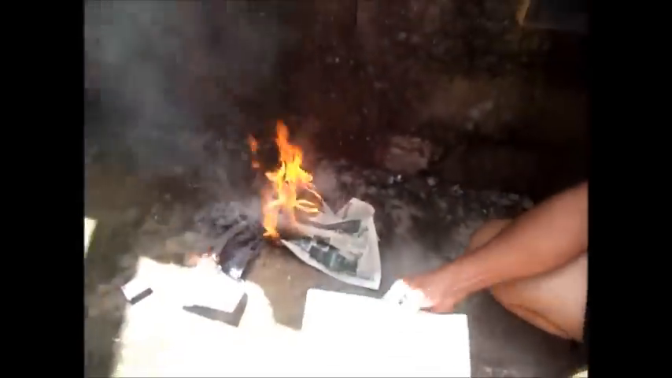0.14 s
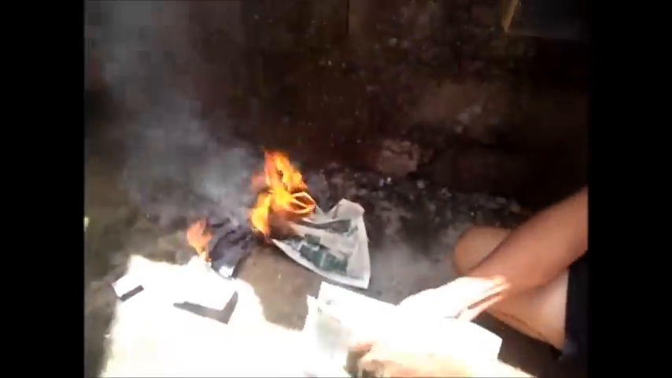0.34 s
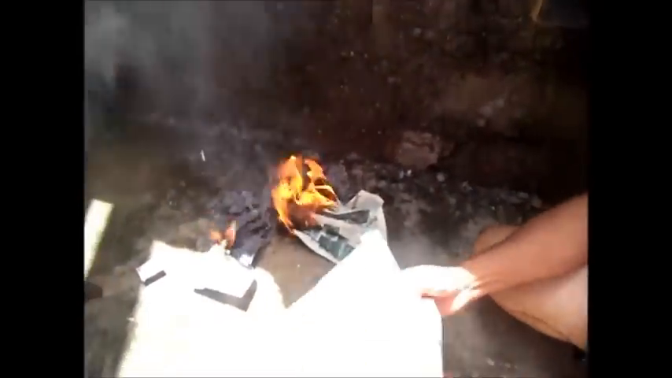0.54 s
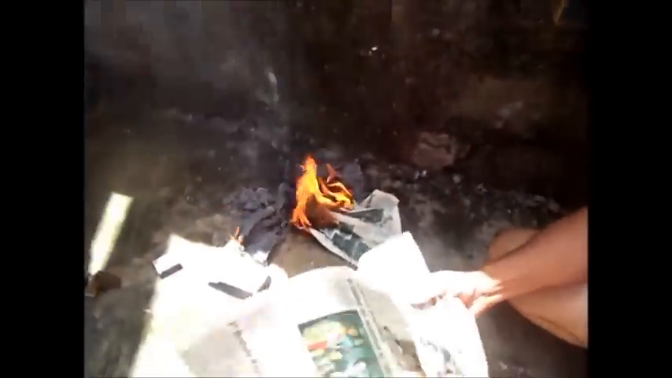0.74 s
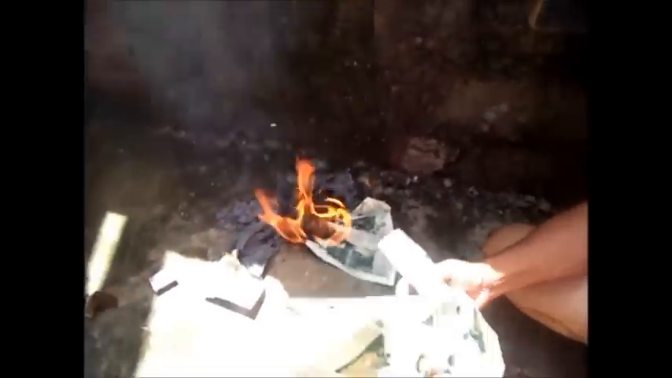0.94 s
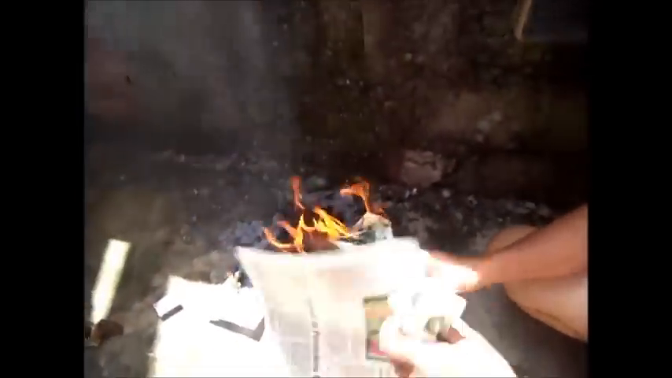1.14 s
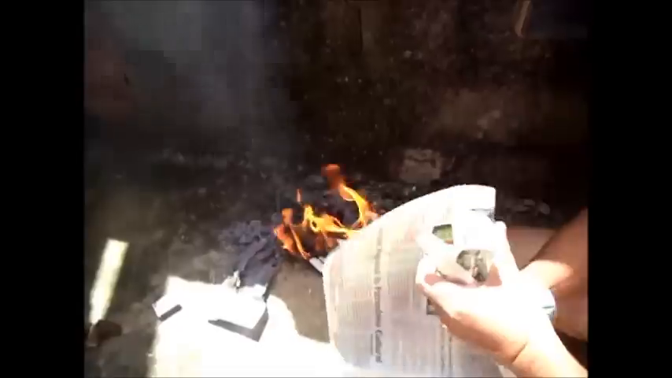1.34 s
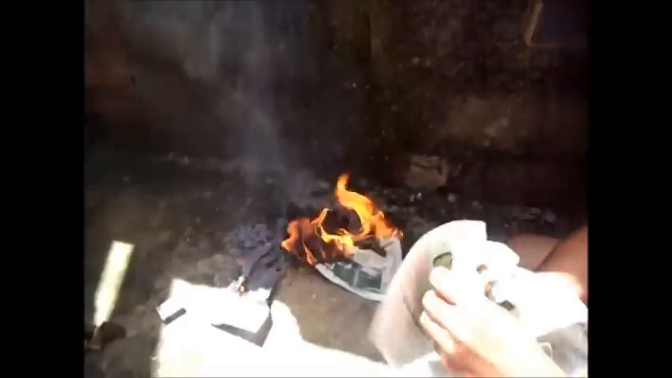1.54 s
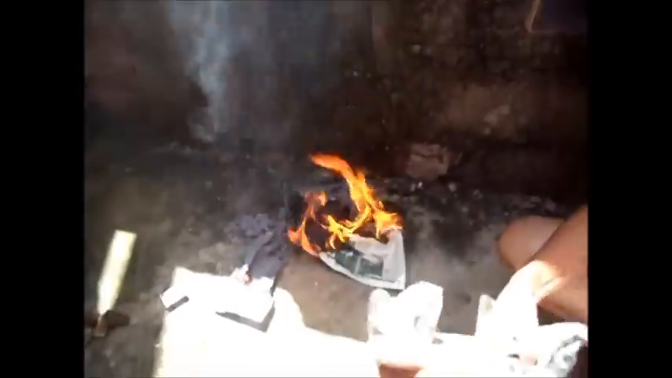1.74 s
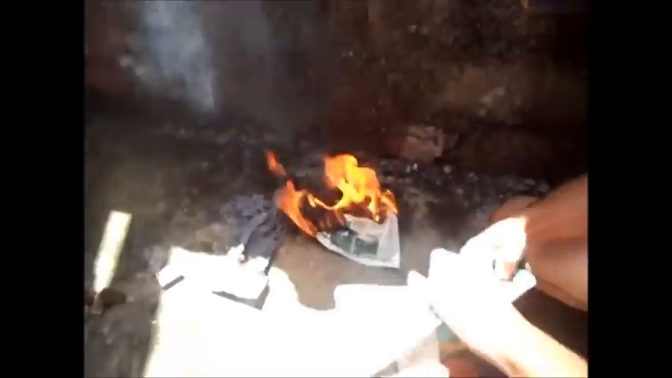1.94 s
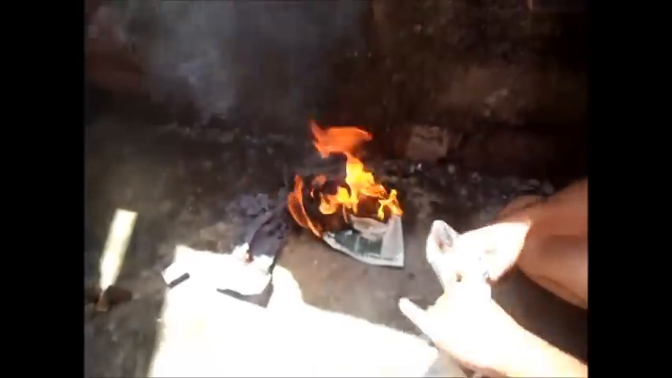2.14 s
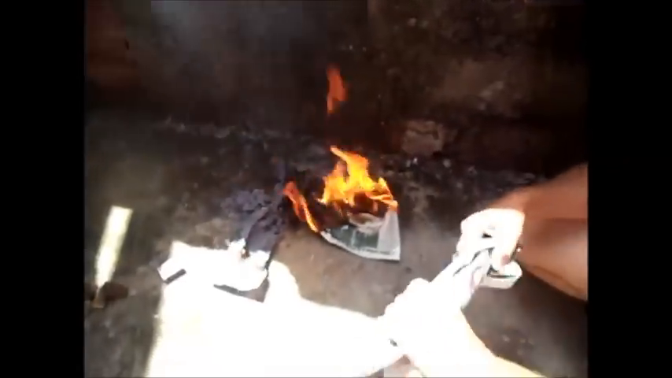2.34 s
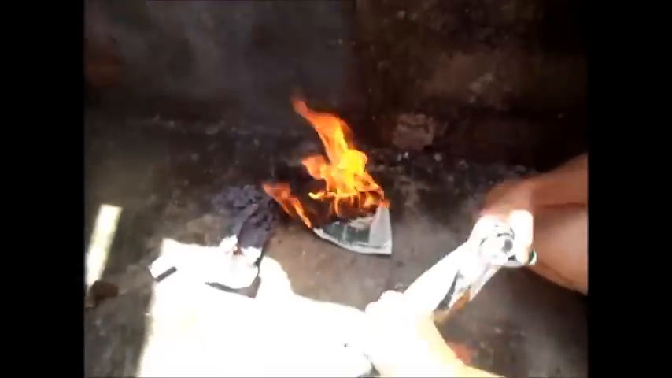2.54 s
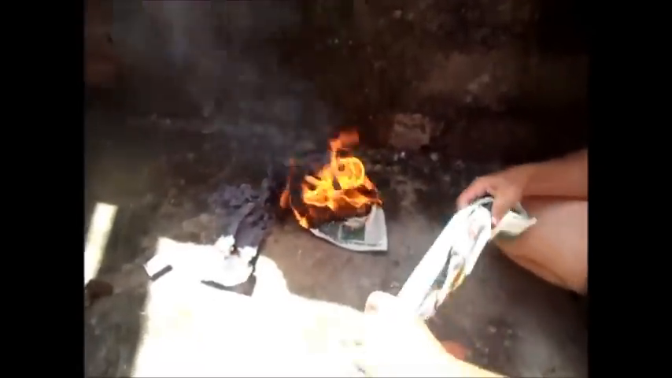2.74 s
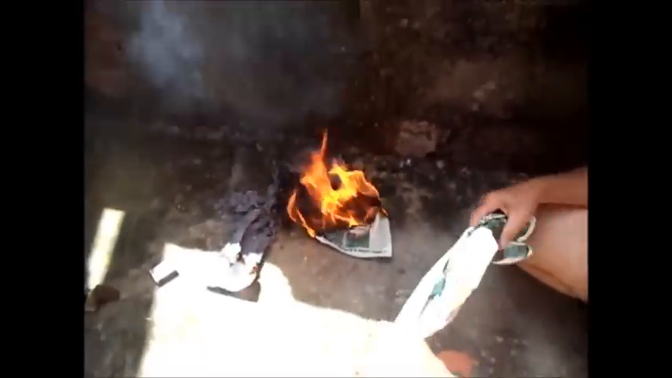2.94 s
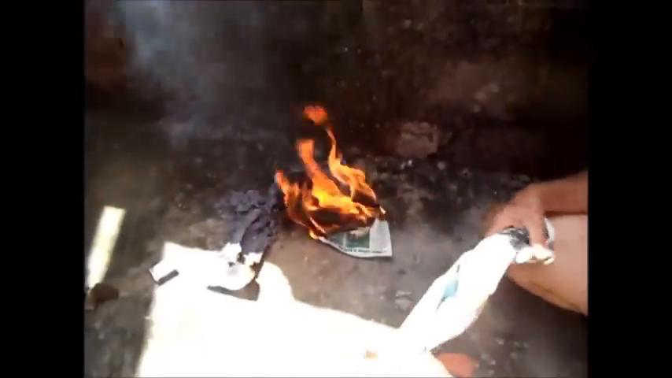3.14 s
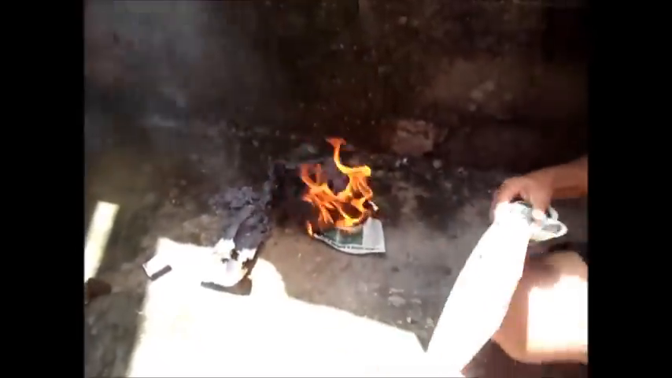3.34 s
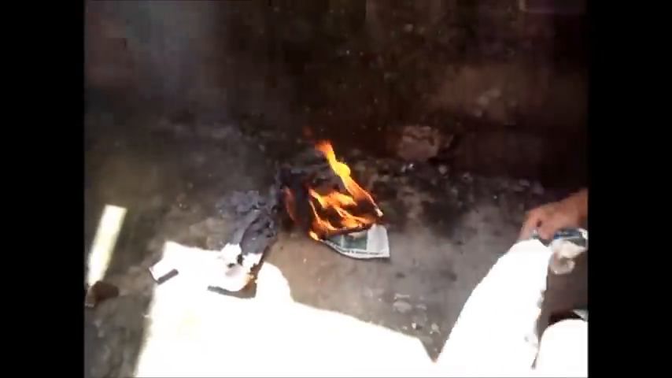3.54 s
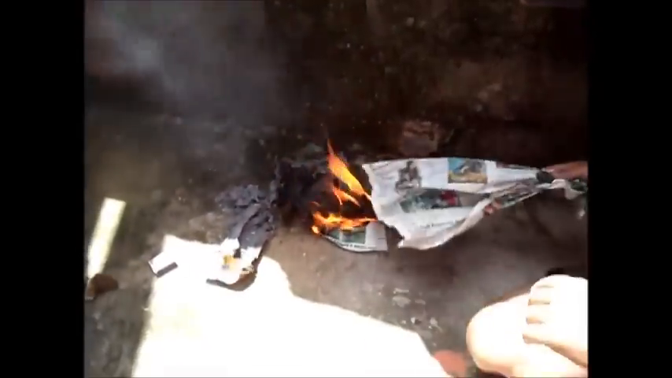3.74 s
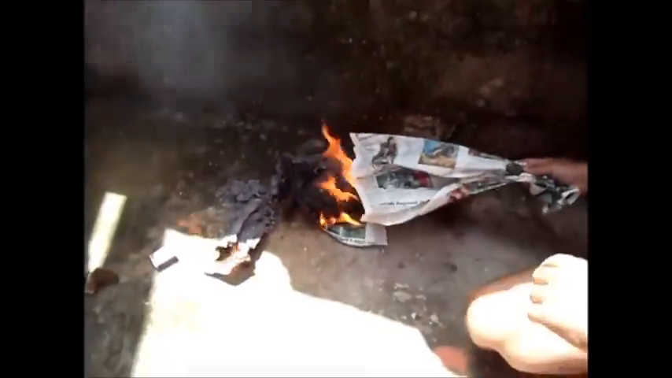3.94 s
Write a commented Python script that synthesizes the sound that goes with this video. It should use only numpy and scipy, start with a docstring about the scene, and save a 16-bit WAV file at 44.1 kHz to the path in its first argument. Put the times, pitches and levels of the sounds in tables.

```python
"""A dull tap and faint rustling open the scene: hands lift a sheet of newspaper, crush it and twist it into a spill.
Countless tiny ringing buckles and sliding noise make the rustle; filtered noise bursts make the
dull taps of the sheet popping through, the sharp snaps of creases and the bumps on the wad.
Underneath, a small paper fire flutters as low noise, with a faint mains hum of summed harmonics and soft air.
A close yard wall and the ground answer the paper briefly."""
import sys
import numpy as np
from scipy import signal
from scipy.fft import rfft, irfft, next_fast_len
from scipy.io import wavfile
from scipy.ndimage import uniform_filter1d, map_coordinates

SR = 44100
rng = np.random.default_rng(int(sys.argv[2]) if len(sys.argv) > 2 else 0)


def master_out(mix):
    """Clip the mix to full scale and print it as 16-bit PCM to the path in sys.argv[1]."""
    frames = np.transpose(np.atleast_2d(mix))
    ceiling = np.clip(frames, -1, 1)
    pcm = np.round(ceiling * 32767).astype(np.int16)
    wavfile.write(sys.argv[1], SR, pcm)


N = 176400

# how hard the hands keep working the sheet: time_s, crisp_level_db, hollow_flex_re_crisp_db (before FLEX_DB)
HANDLING = [(0, -52, 2), (.11, -53.5, 5), (.17, -44.5, -5.5), (.43, -50, 2), (.49, -36.5, -2),
            (.68, -39, 6.5), (.73, -46.5, 3.5), (.99, -43, -2), (1.1, -36.5, 0.5), (1.5, -47, 4.5),
            (1.555, -52, 3), (1.65, -32, 4), (2.0, -36, -1), (2.21, -38.5, -9.5), (2.33, -37, -2.5),
            (3.05, -34, -5.5), (3.29, -40.5, -3), (3.6, -42, -2), (3.71, -45.5, -4), (3.78, -54, 4),
            (4, -57.5, 4)]
# pushes and slides of the paper: middle_s, length_s, crisp_level_db, hollow_flex_re_crisp_db (before FLEX_DB)
PUSHES = [(0.041, 0.027, -49, 8), (0.208, 0.024, -40, -2), (0.26, 0.021, -36, -13), (0.344, .04, -38, 3),
          (0.473, 0.019, -35, 3), (0.628, 0.045, -34, -0.5), (.68, 0.032, -33, 5),
          (0.782, 0.065, -37.5, -7), (0.915, 0.046, -35, 4), (1.192, 0.037, -28, -6),
          (1.454, 0.015, -29.5, -25), (1.591, 0.016, -25, -8), (1.651, 0.071, -29.5, -3),
          (1.733, .016, -30.5, -6), (1.808, .083, -30, -1.5), (2.093, 0.051, -35, -2),
          (2.321, 0.043, -30.5, -6.5), (2.39, 0.094, -34, -4), (2.488, 0.053, -29.5, -11),
          (2.582, 0.057, -27, -8), (2.738, 0.014, -28, -4.5), (2.785, 0.014, -32, -1),
          (2.834, 0.03, -28, -18), (2.927, 0.019, -30, -13), (3.234, 0.039, -29.5, -7.5),
          (3.654, 0.035, -25, -10), (3.684, 0.046, -38, 1)]
# slack sheet flipping over: start_s, level_over_1ms_db
TAPS = [(.0148, -27), (.0617, -34), (.139, -40.5), (1.7045, -25.5), (2.503, -30)]
# creases giving way: start_s, level_over_1ms_db (before SNAP_DB), brightness_db_per_octave
SNAPS = [(.1512, -41, 0), (0.3279, -17, -2), (0.354, -29, 0), (0.387, -24.5, -5.5), (0.3958, -26.5, -2),
         (0.407, -32, 1), (.444, -29, -2.5), (.48, -22, 1.5), (0.52, -18.5, 0.5), (.5532, -29, -8.5),
         (0.571, -27.5, -5), (0.612, -20, 3), (0.613, -21.5, -4), (0.6337, -15, 7.5), (0.682, -19, 1),
         (0.701, -26, 0), (0.7373, -29.5, -6.5), (.7533, -26, 5), (0.782, -25, 7), (.8005, -22, -3.5),
         (0.8778, -24.5, 0), (0.899, -18.5, -0.5), (.9105, -25.5, 3), (0.9155, -19.5, 2), (0.9276, -12, 2),
         (0.9299, -18.5, -2.5), (0.941, -18, 9), (.9462, -25, -4.5), (.956, -33, 0), (.9692, -27, -6),
         (1.045, -24.5, -3), (1.056, -28, 4), (1.0719, -24, -4.5), (1.0845, -19.5, 5), (1.125, -26, -1),
         (1.175, -21.5, 7), (1.178, -27, -5.5), (1.1953, -16.5, 3), (1.285, -24, -0.5),
         (1.291, -18.5, -4.5), (1.3062, -23, -3), (1.3178, -19, 4), (1.346, -24.5, -1), (1.448, -24, -5.5),
         (1.4873, -29.5, -7), (1.5829, -24, -4), (1.59, -15.5, 0), (1.6216, -17, -0.5), (1.658, -24, -11),
         (1.672, -23, 0), (1.688, -22.5, -5), (1.74, -10, 11), (1.751, -20, 4), (1.7634, -16, 0),
         (1.782, -18.5, 6), (1.795, -23, -1), (1.8158, -20, -1), (1.827, -17.5, 3), (1.836, -23, 1),
         (1.8522, -23, 0), (1.8615, -17, 3), (1.8752, -26, 2), (1.9022, -20, -4), (1.927, -20.5, 0),
         (2.0164, -21.5, -4), (2.0414, -15, -3), (2.0488, -29, 0), (2.157, -24.5, -3), (2.236, -18, 6.5),
         (2.286, -24, -4), (2.3528, -13.5, 7), (2.3937, -22, -1), (2.404, -21, 2), (2.4666, -21.5, -2),
         (2.4886, -24, 5), (2.5173, -18.5, -3), (2.5307, -17.5, -3.5), (2.5602, -17, 4), (2.584, -20, -3),
         (2.614, -25, 0), (2.678, -27.5, 3), (2.7245, -20, 3), (2.7674, -17.5, -4), (2.8087, -24, -1),
         (2.8248, -17.5, 9), (2.872, -20, -2), (2.91, -20.5, 7), (2.991, -26, -1.5), (3.016, -21, 5),
         (3.066, -23, 3), (3.0938, -25, -3.5), (3.14, -19.5, 0), (3.155, -22, 2), (3.163, -19.5, 1),
         (3.23, -31, 5), (3.2534, -21, -3), (3.318, -26.5, -5), (3.364, -22.5, 4), (3.42, -25.5, -7),
         (3.4286, -21, 0), (3.5475, -20.5, -3), (3.567, -27, 4), (3.592, -21.5, -1.5), (3.634, -25, -4),
         (3.7107, -31.5, -1), (3.754, -29, 5.5), (3.805, -30, -5), (3.977, -33, 0)]
# hands bumping the wad: start_s, level_over_10ms_db
BUMPS = [(1.645, -52), (1.729, -43), (2.039, -39)]
# low flutter of the fire: time_s, level_db (before its random wobble)
FIRE_LEVEL = [(0, -52.5), (.08, -56), (.29, -53.5), (.38, -67), (.49, -53), (.74, -58.5), (.85, -51.5),
              (.98, -77), (1.42, -69), (1.56, -56), (2.17, -72), (2.44, -59), (2.6, -68), (2.78, -57),
              (3.05, -73), (3.32, -57.5), (3.5, -66)]
# mains harmonics from the first up: level_db (before HUM_SWELL)
HUM_HARMONICS = [-68.5, -66, -73.5, -67.5, -74, -69.5, -74, -72.5]
# swell of the whole hum: time_s, gain_db
HUM_SWELL = [(0, -2.5), (1.2, -5), (2.1, -7), (2.7, 0.5), (4, -0.5)]

# relative spectrum of the small folds: frequency_hz, gain_db
CRISP_SPECTRUM = [(100, -70), (600, -24.5), (1300, -20), (2600, -5.5), (3600, -4), (5200, -1), (6800, -1),
                  (8500, -1), (10200, -1.5), (12000, -7.5)]
# relative spectrum of the flexing open sheet: frequency_hz, gain_db
FLEX_SPECTRUM = [(50, -33), (150, -3.5), (350, -5.5), (600, 1), (1100, -1.5), (1900, 4.5), (3000, 0.5),
                 (5000, -15), (10000, -30)]
# relative spectrum of a tap: frequency_hz, gain_db
TAP_SPECTRUM = [(200, -23), (900, -10), (1700, 1), (2800, 1), (4500, -14), (9000, -21)]
# relative spectrum of a snap, before facet colour and tilt: frequency_hz, gain_db
SNAP_SPECTRUM = [(60, -19), (300, -27.5), (900, -16), (1500, -13), (2700, -2.5), (4000, -2), (5800, 4),
                 (8000, 2), (10200, 2.5), (12000, -6.5)]
# relative spectrum of a bump: frequency_hz, gain_db
BUMP_SPECTRUM = [(30, -33), (110, 0), (200, 4.5), (360, 0.5), (520, -10), (750, -3), (1500, -15),
                 (6000, -29)]
# relative spectrum of the flames: frequency_hz, gain_db
FLAME_SPECTRUM = [(20, 2.5), (45, -15), (90, 3.5), (108, -4), (127, 11), (155, -3), (220, -2), (500, -11.5),
                  (3000, -53)]
# relative spectrum of the still air: frequency_hz, gain_db
AIR_SPECTRUM = [(20, -23), (60, 11), (200, -5.5), (550, 5.5), (1000, 4.5), (2000, -13.5), (4000, -6),
                (5600, -10), (7000, -18), (11000, -9.5)]

BUCKLES_PER_S, BUCKLE_SPREAD_DB, BUCKLE_MAX_DB = 800, 1.5, 7
CROWDING = .4  # buckle rate grows as this power of the rustle's strength
CRISP_FADE_S, FLEX_FADE_S = 0.00085, 0.00096
RISE_SHARE = 0.62  # rise time over fade time of a buckle
PITCH_SPREAD = .28  # natural-log spread of a buckle's modes
CRISP_SLIDE_DB, FLEX_SLIDE_DB, FLEX_DB = -1, 2, -8
SLIPS_PER_S, SLIP_FADE_S, SLIP_SPREAD_DB, STEADY_SHARE = 170, .003, 3, .62
TAP_FADE_S = 0.0021
SNAP_DB, SNAP_FADE_S, SNAP_RISE_SHARE = 0.5, .0012, .4
CRACK_DB, CRACK_FADE_S, CRACK_GAP_S, CRACK_LOSS_DB = -5, 0.00027, .0012, 5.5
FACET_DB, FACET_OCTAVES = 5, .45
PIVOT_HZ = 6000  # brightness tilts about this frequency
BUMP_RUB_DB, BUMP_FADE_S = -5, 0.0029
MAINS_HZ, AIR_DB = 60, -57
LOW_CUT_HZ = 147  # low cut on the paper sounds, as of a small microphone, keeps deep bass out
WALL_DB, WALL_DELAY_S, WALL_T60_S = -14, .003, .08
TOP_HZ, EDGE_DB_PER_HZ = 10500, .037


def amp(db):
    """Amplitude ratio of a level in dB."""
    return 10 ** (np.asarray(db) / 20)


def unit(x):
    """x scaled to an RMS of 1."""
    return x / np.sqrt(np.mean(x ** 2) + 1e-20)


def curves(rows):
    """One value per sample for each column after the time."""
    time_s, *columns = np.transpose(rows)
    return [np.interp(np.arange(N) / SR, time_s, column) for column in columns]


def wobble(knots_per_s):
    """A smooth random curve."""
    return map_coordinates(rng.standard_normal(2000), [np.arange(N) * knots_per_s / SR], mode="wrap")


def coloured(x, spectrum, tilt_db=0):
    """x through a causal minimum-phase filter with the given spectrum, tilted in dB per octave above 500 Hz."""
    m = 2 * next_fast_len(len(x))
    hz = np.fft.rfftfreq(m, 1 / SR) + 1
    knot_hz, knot_db = np.transpose(spectrum)
    gain_db = np.interp(np.log(hz), np.log(knot_hz), knot_db)
    gain_db += tilt_db * np.log2(np.maximum(hz, 500) / PIVOT_HZ)
    # folding the cepstrum to one side makes the filter causal
    cepstrum = irfft(np.log(amp(gain_db)))
    cepstrum[1:m // 2] *= 2
    cepstrum[m // 2 + 1:] = 0
    response = np.exp(rfft(cepstrum))
    return irfft(rfft(x, m) * response)[:len(x)]


def add(track, start_s, sound):
    """Mix a sound into the track."""
    part = track[max(0, round(start_s * SR)):][:len(sound)]
    part += sound[:len(part)]


def burst(fade_s, rise_share=0, size=1024):
    """A noise burst of unit energy that builds up and dies away."""
    fades = np.arange(1, size + 1) / SR / max(fade_s, 1 / SR)
    rise = 1 - np.exp(-fades / (rise_share + 1e-6))
    noise = rng.standard_normal(size) * np.exp(-fades) * rise
    return noise / np.linalg.norm(noise)


def buckles(strength, low_hz, high_hz, fade_s, modes=7, size=256):
    """Tiny unequal buckles crowd in as the push grows; each rings a few brief modes; local level is evened."""
    rate_per_s = BUCKLES_PER_S * (strength / strength.mean()) ** CROWDING
    start = np.flatnonzero(rng.random(N) < rate_per_s / SR)
    normal = rng.standard_normal((len(start), modes + 1))
    even = rng.random((len(start), modes + 1))
    gain = amp(np.minimum(BUCKLE_SPREAD_DB * normal[:, :1], BUCKLE_MAX_DB))
    centre_hz = low_hz + (high_hz - low_hz) * even[:, :1]
    mode_hz = centre_hz * np.exp(PITCH_SPREAD * normal[:, 1:])
    t = np.arange(size) / SR
    cycles = mode_hz[..., None] * t + even[:, 1:, None]
    ring = np.sin(2 * np.pi * cycles).sum(1)
    envelope = np.exp(-t / fade_s) * (1 - np.exp(-t / (RISE_SHARE * fade_s)))
    grains = gain * ring * envelope
    places = start[:, None] + np.arange(size)
    x = np.bincount(places.ravel(), grains.ravel(), N + size)[:N]
    local_power = np.abs(uniform_filter1d(x ** 2, size=1100))
    return x / np.sqrt(local_power + 0.0016)


def slips():
    """Stick and slip: paper yields in small jerks that start at once and die away; a gain around 1."""
    jerks = (rng.random(N) < SLIPS_PER_S / SR) * amp(SLIP_SPREAD_DB * rng.standard_normal(N)) ** 2
    power = signal.lfilter([1], [1, -np.exp(-1 / (SLIP_FADE_S * SR))], jerks)
    usual = np.abs(uniform_filter1d(power, size=1500)) + power.mean() / 10
    return np.sqrt(STEADY_SHARE + (1 - STEADY_SHARE) * power / usual)


def rustle():
    """Buckling and sliding follow the hands: crisp in small folds, hollow where the open sheet flexes."""
    t = np.arange(N) / SR
    level_db, hollow_db = curves(HANDLING)
    crisp_power = amp(level_db) ** 2
    flex_power = amp(level_db + hollow_db) ** 2
    for middle_s, length_s, push_db, push_hollow_db in PUSHES:
        swell = np.exp(-np.abs(2 * (t - middle_s) / length_s) ** 3)
        crisp_power += swell * amp(push_db) ** 2
        flex_power += swell * amp(push_db + push_hollow_db) ** 2
    crisp_strength, flex_strength = np.sqrt(crisp_power), np.sqrt(flex_power)
    crisp = buckles(crisp_strength, 1016, 11950, CRISP_FADE_S)
    crisp += amp(CRISP_SLIDE_DB) * rng.standard_normal(N)
    flex = buckles(flex_strength, 186, 3440, FLEX_FADE_S)
    flex += amp(FLEX_SLIDE_DB) * rng.standard_normal(N)
    crisp = crisp_strength * unit(coloured(crisp, CRISP_SPECTRUM))
    flex = amp(FLEX_DB) * flex_strength * unit(coloured(flex, FLEX_SPECTRUM))
    return slips() * (crisp + flex)


def fire():
    """Small flames flutter, low and soft: noise under a wobbling level."""
    level_db, = curves(FIRE_LEVEL)
    flames = unit(coloured(rng.standard_normal(N), FLAME_SPECTRUM))
    return amp(level_db + wobble(21)) * flames


def background():
    """Still outdoor air as noise, and a faint mains hum whose harmonics waver slightly in phase."""
    t = np.arange(N) / SR
    swell_db, = curves(HUM_SWELL)
    hum = np.zeros(N)
    for k, db in enumerate(HUM_HARMONICS, 1):
        phase = 2 * np.pi * (k * MAINS_HZ * t + rng.random()) + .2 * wobble(4)
        hum += amp(db) * np.sqrt(2) * np.sin(phase)
    air = amp(AIR_DB) * unit(coloured(rng.standard_normal(N), AIR_SPECTRUM))
    return amp(swell_db) * hum + air


def taps():
    """A broad stretch of the sheet pops through: one push, then a short, dull shiver."""
    out = np.zeros(N)
    for start_s, level_db in TAPS:
        push = burst(TAP_FADE_S)
        push[0] += 1
        tap = coloured(push, TAP_SPECTRUM)
        add(out, start_s, amp(level_db) * np.sqrt(SR / 1000) * tap / np.linalg.norm(tap))
    return out


def snaps(cracks=3):
    """A crease flips with a stutter of ever weaker cracks; the facet that it frees shivers and colours it."""
    out = np.zeros(N)
    hz = np.geomspace(60, 12000, 60)
    base_db = np.interp(hz, *np.transpose(SNAP_SPECTRUM))
    for start_s, level_db, bright_db in SNAPS:
        facet_hz = rng.uniform(1500, 11200)
        facet_db = FACET_DB * np.exp(-(np.log2(hz / facet_hz) / FACET_OCTAVES) ** 2)
        flip = burst(SNAP_FADE_S, SNAP_RISE_SHARE)
        for k in range(cracks):
            crack_s = CRACK_GAP_S * (.5 + k * (.5 + rng.random()))
            add(flip, crack_s, amp(CRACK_DB - k * CRACK_LOSS_DB) * burst(CRACK_FADE_S))
        snap = coloured(flip, np.c_[hz, base_db + facet_db], bright_db)
        add(out, start_s, amp(level_db + SNAP_DB) * np.sqrt(SR / 1000) * snap / np.linalg.norm(snap))
    return out


def bumps():
    """The hands close on the wad: one low push and a short, dull rub."""
    out = np.zeros(N)
    for start_s, level_db in BUMPS:
        push = amp(BUMP_RUB_DB) * burst(BUMP_FADE_S, size=4096)
        push[0] += 1
        knock = coloured(push, BUMP_SPECTRUM)
        add(out, start_s, amp(level_db) * np.sqrt(SR / 100) * knock / np.linalg.norm(knock))
    return out


def yard(x, parts=24):
    """Ground and wall answer briefly: a fresh random noise tail per part keeps the echo's colour from staying fixed."""
    out = x.copy()
    for part in np.array_split(np.arange(N), parts):
        tail = burst(WALL_T60_S / np.log(1000), size=8192)
        echo = amp(WALL_DB) * signal.fftconvolve(x[part], tail)
        add(out, part[0] / SR + WALL_DELAY_S, echo)
    return out


def scene():
    """The paper in the yard, over the fire and the background."""
    low_cut = signal.butter(2, LOW_CUT_HZ, "highpass", fs=SR, output="sos")
    paper = signal.sosfilt(low_cut, rustle() + taps() + snaps() + bumps())
    return (yard(paper) + fire() + background())[None]


def record(dry):
    """The recorder cuts off steeply above its band limit."""
    m = next_fast_len(N + SR // 2)
    hz = np.fft.rfftfreq(m, 1 / SR)
    gain = amp(-EDGE_DB_PER_HZ * np.maximum(hz - TOP_HZ, 0))
    return irfft(rfft(dry, m) * gain, m)[..., :N]


dry = scene()
out = record(dry)
master_out(out)
```